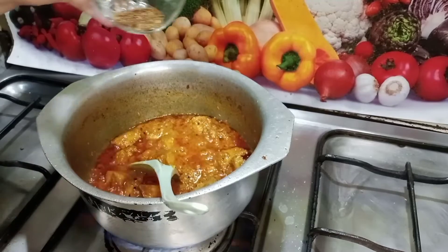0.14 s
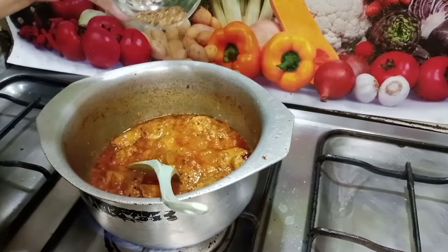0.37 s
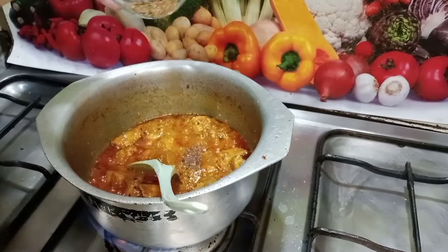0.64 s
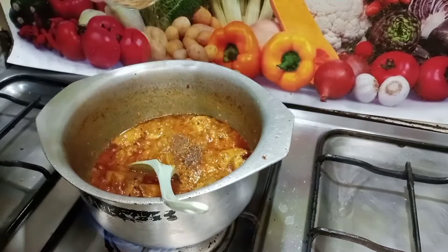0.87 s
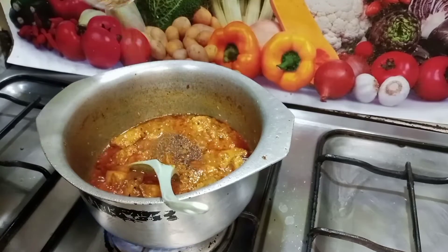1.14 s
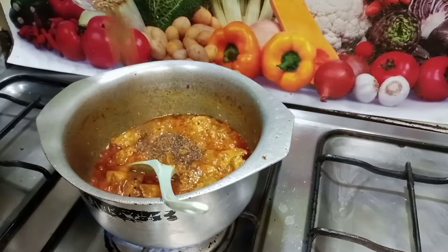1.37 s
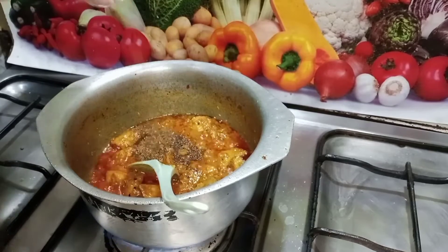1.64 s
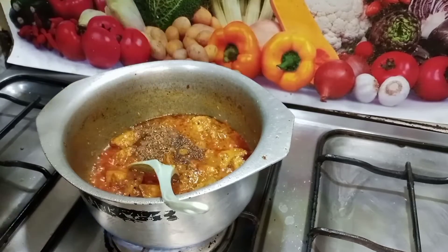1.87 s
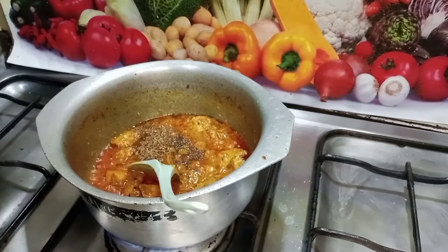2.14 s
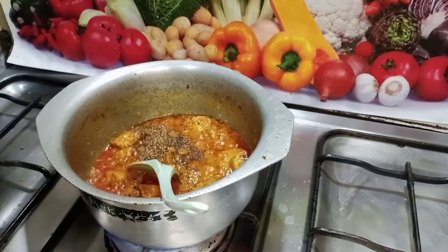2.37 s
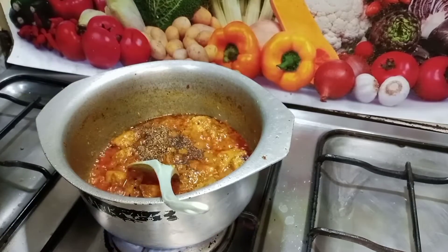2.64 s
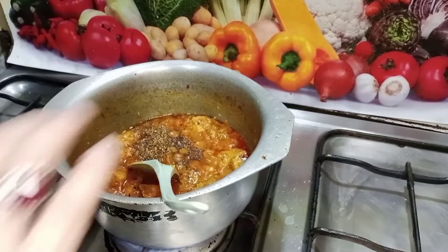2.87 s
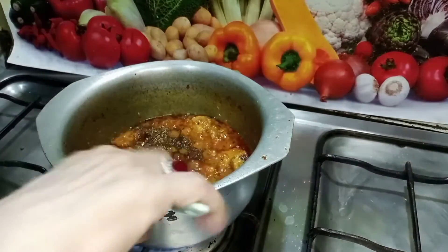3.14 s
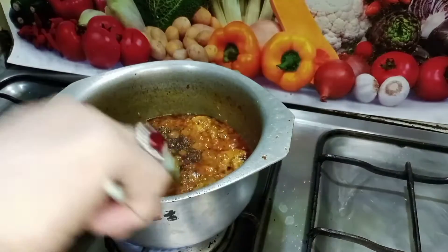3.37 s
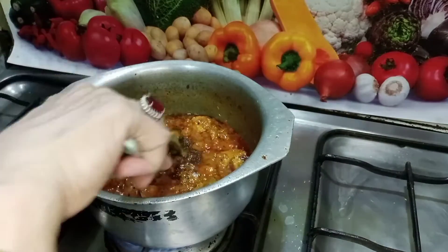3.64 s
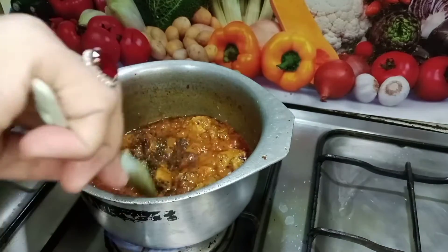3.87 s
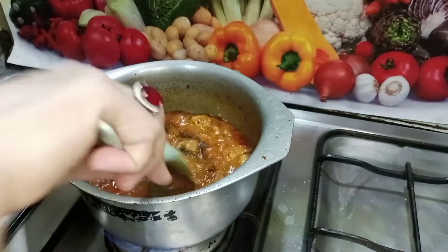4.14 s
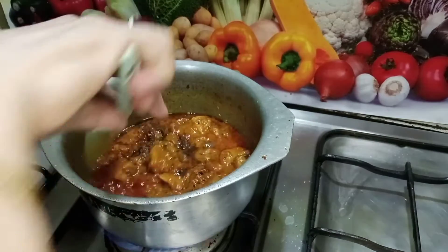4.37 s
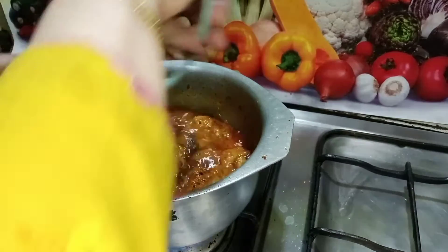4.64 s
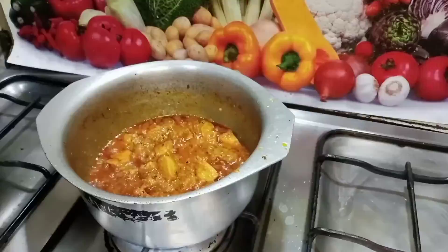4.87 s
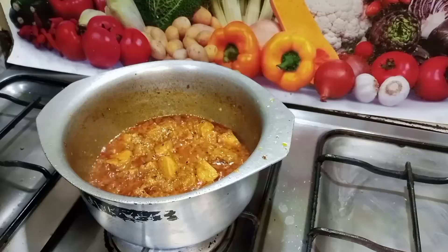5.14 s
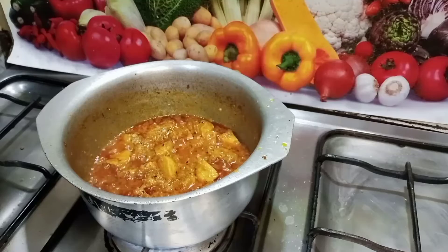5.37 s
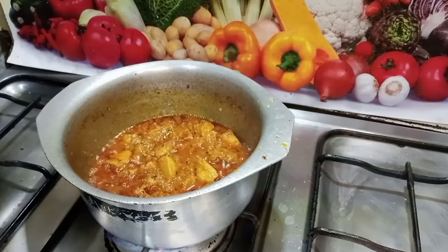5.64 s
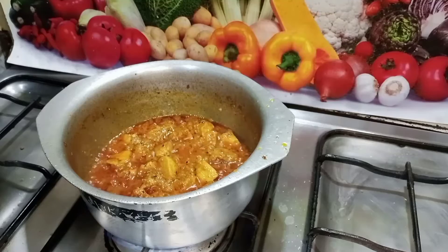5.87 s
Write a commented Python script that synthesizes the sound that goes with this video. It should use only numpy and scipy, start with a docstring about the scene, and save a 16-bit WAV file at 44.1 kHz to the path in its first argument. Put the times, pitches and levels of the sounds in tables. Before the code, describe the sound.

In a small hard kitchen, a thick curry fizzes and crackles in a thin metal pot above a soft gas flame. Fat spits now and then. Midway a dish is set down hard off to the side and bounces briefly. A ladle then knocks the pot, rings and scrapes its wall, and jolts the stove top with soft thumps before the simmering continues alone. A close phone microphone gives slightly dull treble.

```python
"""Fat fizzes and spits over a soft gas flame as a curry simmers in a thin metal pot in a small hard kitchen.
A dish is set down; a ladle knocks and scrapes the pot and jolts the stove top; all falls silent for 8 ms.
Fizz, roar and rumble are filtered noise with wandering levels; struck things are sums of decaying modes,
and scrapes are stick-slip noise driving the pot's modes.
The microphone is a phone whose treble ends near 8 kHz."""
import sys
import numpy as np
from scipy import signal
from scipy.fft import rfft, irfft
from scipy.io import wavfile
from scipy.ndimage import uniform_filter1d

SR = 44100
rng = np.random.default_rng(int(sys.argv[2]) if len(sys.argv) > 2 else 0)


def elevation(decibels):
    """Turn decibel levels (scalar or array-like) into linear amplitude ratios."""
    levels = np.asarray(decibels, float)
    return 10 ** (levels / 20)


def wav_record(signal):
    """Record a signal, one row per channel, as 16-bit PCM in the file named by sys.argv[1]."""
    frames = np.transpose(np.atleast_2d(signal))
    bounded = np.clip(frames, -1, 1)
    # unit amplitude maps onto the largest positive 16-bit level
    quanta = np.round(bounded * 32767).astype(np.int16)
    wavfile.write(sys.argv[1], SR, quanta)


N = 264893
T = np.arange(N) / SR
HZ = np.arange(N // 2 + 1) * SR / N + 1  # the added 1 Hz keeps the logarithm finite
SILENT_FROM_S, SOUND_AGAIN_S = 5.0915, 5.0995


def unit(x):
    """Normalisation: scale to rms 1."""
    return x / np.sqrt(np.mean(x ** 2))


def onset(x):
    """Normalisation by the attack: rms 1 / 3 over the first 10 ms, which puts the peak near 1."""
    return x / 3 / np.sqrt(np.mean(x[:SR // 100] ** 2))


def colour(x, points):
    """Linear filtering: gain in dB at points in Hz, joined on a log frequency axis."""
    hz, db = np.transpose(points)
    return irfft(rfft(x) * elevation(np.interp(np.log(HZ), np.log(hz), db)), N)


def band(x, lo_hz, hi_hz):
    """Causal band-pass filtering."""
    return signal.sosfilt(signal.butter(2, [lo_hz, hi_hz], "band", fs=SR, output="sos"), x)


def walk(rate):
    """Slow random modulation: levels drawn at this rate per second, smoothed twice, rms 1."""
    hold = int(SR / rate)
    steps = np.repeat(rng.standard_normal(N // hold + 1), hold)
    return unit(uniform_filter1d(uniform_filter1d(steps, hold), hold)[:N])


def clicks(per_s, spread_db):
    """Poisson-like impulses: random in time, most small and a few large."""
    size = elevation(spread_db * np.minimum(rng.exponential(size=N), 5))
    return (rng.random(N) < per_s / SR) * rng.standard_normal(N) * size


def burst(lo_hz, hi_hz, t60):
    """Exponentially decaying band of noise."""
    puff = band(rng.standard_normal(SR // 4), lo_hz, hi_hz)
    return onset(puff * elevation(-60 * T[:SR // 4] / t60))


def ring(modes):
    """Modal superposition: decaying sines, neighbours in opposite phase."""
    t = T[:SR // 2]
    out = 0
    for k, (hz, db, t60) in enumerate(modes):
        out = out + (-1) ** k * elevation(db - 60 * t / t60) * np.sin(2 * np.pi * hz * t)
    return onset(out)


def rattle(modes, contact_s):
    """Modal excitation by a short uneven contact, at first flat in spectrum, that weakens by 16 dB."""
    contact = rfft(rng.standard_normal(int(contact_s * SR)))
    contact = irfft(contact / np.abs(contact))
    contact = contact * elevation(-16 * np.linspace(0, 1, len(contact)))
    return onset(band(signal.fftconvolve(ring(modes), contact)[:SR // 2], 170, 7800))


def strike(events, response):
    """Superposition: sound a response at each (start in seconds, level in dB)."""
    out = np.zeros(N + len(response))
    for s, db in events:
        start = int(s * SR)
        out[start:start + len(response)] += elevation(db) * response
    return out[:N]


def favour(hz, contact_hz, lift_db):
    """Modal coupling: the place of contact lifts, in dB, the wall modes near its own pitch."""
    return lift_db * np.exp(-(np.log(hz / contact_hz) / 0.067) ** 2)  # width in natural log of Hz


def rumble():
    """Band noise with a falling envelope: a low rumble that dies away from the start."""
    start_db, fade_db_per_s = -54.5, 11.5
    level_db = start_db - fade_db_per_s * T + 2.5 * walk(12)
    return elevation(level_db) * unit(band(rng.standard_normal(N), 260, 560))


# Air resonances of the pot. Each row: frequency in Hz, width in Hz, boost in dB (negative for a dip).
POT_AIR = [(655.5, 25, 7.5), (1237, 62, 9.5), (1914, 170, 4.5), (2447, 39, 2.5), (2956, 24, 5),
           (3780, 26, 7.5), (4520, 390, -2.5), (6400, 77, 8)]


def pot_air(x):
    """Cavity resonance: standing waves in the open pot lift their own pitches."""
    gain = 1
    for hz, width_hz, boost_db in POT_AIR:
        gain = gain + (elevation(boost_db) - 1) / (1 + (2 * (HZ - hz) / width_hz) ** 2)
    return unit(irfft(rfft(x) * gain, N))


# Colour of the flame noise ahead of the pot's air. Each row: frequency in Hz, relative gain in dB.
ROAR_COLOUR = [(18, -65), (34, -23.5), (113, -3.5), (412, -7.5), (667, -2), (908, -8.5), (1210, -5.5),
               (1680, -11.5), (1850, -10), (2720, -16.5), (3000, -11.5), (3900, -45.5), (6600, -120)]


def flame():
    """Turbulent noise: a gas roar fluttering by octaves, a wavering stove-top boom, a faint burner whistle."""
    parts = 0
    for lo_hz in 20 * 2. ** np.arange(9):
        parts = parts + elevation(1.56 * walk(8)) * band(rng.standard_normal(N), lo_hz, 2 * lo_hz)
    roar = pot_air(colour(parts, ROAR_COLOUR) * elevation(0.88 * walk(6)))
    boom_hz, boom_width_hz = 111, 38.5
    boom = band(rng.standard_normal(N), boom_hz - boom_width_hz / 2, boom_hz + boom_width_hz / 2)
    boom = unit(boom * elevation(2.2 * walk(5.1)))
    whistle_hz, whistle_db = 2190, -64.5
    whistle = np.sin(2 * np.pi * np.cumsum(whistle_hz + 2.6 * walk(3)) / SR)
    return roar, boom, elevation(whistle_db) * whistle


# Colour of the bubble noise ahead of the pot's air. Each row: frequency in Hz, relative gain in dB.
FIZZ_COLOUR = [(820, -54.5), (1400, -9), (1710, -21.5), (1850, -12.5), (2300, -13.5), (2520, -3.5),
               (2750, -10.5), (3000, -4.5), (3340, -5.5), (6420, -1.5), (7800, -5), (10100, -24.5),
               (17200, -120)]


def fizz():
    """Random superposition: tiny steam bubbles burst in the fat, each band flaring alone; droplets crackle."""
    bubbling = 0
    for centre in 1500 * 1.2913 ** np.arange(7):
        bubbles = rng.standard_normal(N) + 0.5 * unit(clicks(2500, spread_db=3.0))
        flicker = elevation(0.29 * walk(9) + 0.93 * walk(40))
        bubbling = bubbling + flicker * band(bubbles, centre / 1.185, centre * 1.137)
    flare = elevation(1.1 * walk(6))  # shared by all bands
    droplets = signal.fftconvolve(clicks(250, spread_db=2.5), burst(3000, 7500, 0.011))[:N]
    crackle = elevation(-13.5) * unit(band(droplets, 3000, 7500))
    return pot_air(colour(bubbling, FIZZ_COLOUR) * flare) + crackle


# Loudest spits of fat. Each row: start in seconds, level in dB, pitch in Hz.
SPITS = [(1.7013, -24, 6790), (2.277, -30, 6550), (3.629, -32.5, 6800), (3.789, -36, 5960),
         (4.01, -38, 5500), (4.07, -36.5, 6400), (5.699, -36.5, 6640)]


def spits():
    """Bubble resonance: single bigger bubbles pop with a short bright ring and a splutter."""
    out = 0
    for s, db, hz in SPITS:
        pop = 0.72 * ring([(hz, 0, 0.02)])[:SR // 4]
        splutter = burst(0.83 * hz, 1.09 * hz, 0.078)
        out = out + strike([(s, db)], pop + splutter)
    return out


# Modes of dish and counter. Each row: frequency in Hz, relative level in dB, 60 dB decay time in seconds.
COUNTER = [(360, -13, 0.05), (564, -13.5, 0.04), (703, -8.5, 0.04), (860, -3.5, 0.03), (1030, 3.5, 0.02),
           (1170, 11.5, 0.026), (1285, 7, 0.035), (1410, 10.5, 0.02), (1560, 2.5, 0.017), (1769, 7, 0.07),
           (1900, 6, 0.022), (2130, -5.5, 0.026), (2380, 1, 0.02), (2490, 10, 0.032), (2820, 9, 0.026),
           (3360, -7, 0.02), (3930, -18, 0.02), (4440, -9, 0.019)]
# Blows of the dish. Each row: start in seconds, level in dB, pitch in Hz of the modes it favours.
SET_DOWN = [(3.1200, -13.5, 1800), (3.1290, -20, 1200), (3.1550, -22.5, 1450), (3.1750, -27, 1200),
            (3.1860, -29, 1750), (3.2050, -29, 1800), (3.2550, -33, 1250), (3.277, -32, 1200),
            (3.2880, -35.5, 1750)]


def counter():
    """Impact excitation: a dish set down hard, with a bounce; modes in a dense clack over a dull knock."""
    out = 0
    for s, db, contact_hz in SET_DOWN:
        modes = []
        for hz, mode_db, t60 in COUNTER:
            lift_db = 5.5 * np.exp(-(np.log(hz / contact_hz) / 0.17) ** 2)
            modes.append((hz, mode_db + lift_db, t60))
        clack = elevation(1) * burst(840, 2000, 0.025) + elevation(-8) * burst(2200, 3800, 0.051)
        knock = elevation(-19.5) * burst(220, 480, 0.06)
        out = out + strike([(s, db)], rattle(modes, 0.0068))
        out = out + strike([(s, db)], clack + knock)
    return out


# Modes of the stove top. Each row: frequency in Hz, relative level in dB, 60 dB decay time in seconds.
STOVE_TOP = [(52.5, -15, 0.25), (96.8, 5.5, 0.24), (107.7, 9, 0.12), (160, -18, 0.145), (232, -5.5, 0.13),
             (327, 1, 0.13), (432, -8, 0.093), (620, -7, 0.098), (737, 1, 0.13)]
# Jolts. Each row: start in seconds, level in dB, level in dB of the upper modes against the boom.
THUMPS = [(5.113, -45, 19), (5.123, -26.5, -7), (5.142, -47.5, 22), (5.200, -28.5, -1), (5.243, -29.5, 0),
          (5.29, -37, 2.5)]


def thumps():
    """Plate modes: soft jolts of the stove top, whose two strongest low modes beat."""
    soften = np.clip(T[:SR // 2] / 0.012, 0, 1)
    boom, upper = ring(STOVE_TOP[:3]) * soften, ring(STOVE_TOP[3:]) * soften
    out = 0
    for s, db, upper_db in THUMPS:
        out = out + strike([(s, db)], band(boom + elevation(upper_db) * upper, 35, 1000))
    return out


# Modes of the pot wall, scraped and struck. Each row: frequency in Hz, relative level in dB,
# 60 dB decay time in seconds.
POT = [(640, -8, 0.12), (815, -11.5, 0.052), (1091, -4.5, 0.064), (1542, -2.5, 0.065), (1700, -3.5, 0.065),
       (2116, -16, 0.1), (2240, -6.5, 0.18), (2400, -2.5, 0.16), (2552, -14.5, 0.1), (2710, -4.5, 0.12),
       (2930, -11, 0.14), (3200, -8.5, 0.068), (3686, -3.5, 0.036), (3910, -2, 0.073), (4065, -1.5, 0.079),
       (4280, -2.5, 0.053), (4750, -15.5, 0.059), (5060, -7, 0.07), (5100, -10, 0.087), (5500, -7.5, 0.098),
       (5735, -3.5, 0.037), (5900, -6, 0.067), (6140, -6, 0.08), (6295, -5.5, 0.056), (6540, -4, 0.035),
       (6640, -11.5, 0.05), (6940, -2, 0.074), (7000, -10, 0.05), (7290, -5.5, 0.046), (7500, -6, 0.033)]
# Ladle strokes. Each row: touch in seconds, moment the release begins in seconds, level in dB at touch against
# that moment, drive in dB at that moment of bright rasp, middle rasp and dull rub,
# wall pitch in Hz favoured by the contact.
SCRAPES = [(4.285, 4.313, 1, -31.5, -30, -36.5, 6160), (4.632, 4.663, -2, -28, -31, -50, 5600),
           (4.629, 4.652, 4, -34, -38.5, -51, 4300), (4.684, 4.717, -4.5, -58, -50, -32.5, 790),
           (4.801, 5.1, -4, -33.5, -35, -37.5, 1090), (4.851, 4.848, -4, -42, -32, -53, 2400),
           (4.812, 4.899, -1.5, -39, -49, -45, 5900), (4.936, 4.981, -11, -27, -26, -48, 2470),
           (5.042, 5.048, -8, -41.5, -34, -43.5, 2380), (5.121, 5.147, -2, -38, -32.5, -35.5, 3900),
           (5.176, 5.213, -4.5, -25.5, -28, -41.5, 5060)]


def scrapes():
    """Stick-slip friction: chatter drives the wall modes, each stroke letting go at the same rate."""
    release_db_per_s, wall_ring_db = 254, 6
    slips = unit(clicks(4000, spread_db=0.5)) + 1.1 * rng.standard_normal(N)
    slips = slips * elevation(1.25 * walk(60))
    bands = [unit(band(slips, lo, hi)) for lo, hi in ((3900, 7100), (1920, 3430), (540, 1320))]
    strokes = []
    for touch, release, touch_db, *levels, _ in SCRAPES:
        press_db = np.interp(T, [touch, release, release + 1], [touch_db, 0, -release_db_per_s])
        same_side = (T < SILENT_FROM_S) == (touch < SILENT_FROM_S)  # no stroke spans the silence
        on = np.clip((T - touch) / 0.0087 + 1, 0, 1) * same_side
        chatter = sum(elevation(db) * part for db, part in zip(levels, bands))
        strokes.append(on * elevation(press_db) * chatter)
    strokes = np.array(strokes)
    contact_hz = np.array(SCRAPES)[:, -1]
    sung = 0
    for hz, db, t60 in POT:
        drive = elevation(favour(hz, contact_hz, lift_db=7)) @ strokes
        peak = signal.iirpeak(hz, hz * t60 * np.pi / np.log(1000), fs=SR)  # Q from the decay time
        sung = sung + signal.lfilter(*peak, elevation(wall_ring_db + db + 1.9 * walk(18)) * drive)
    return sung + elevation(-10) * strokes.sum(axis=0)


# Modes of the ladle. Each row: frequency in Hz, relative level in dB, 60 dB decay time in seconds.
LADLE = [(250, -11, 0.03), (600, -1, 0.022), (676, 1.5, 0.029), (900, 3.5, 0.0094), (1135, 2, 0.015),
         (1250, 2.5, 0.023), (1390, 6.5, 0.019), (1875, -1.5, 0.023), (2380, -1.5, 0.0078),
         (2930, 1.5, 0.008)]
# Ladle blows. Each row: start in seconds, levels in dB of ladle, pot wall and crack,
# pitch in Hz of the crack and of the wall modes it favours.
BLOWS = [(3.911, -38, -41, -39, 1250), (4.2790, -12.5, -19, -22, 4970), (4.2830, -24, -29, -20, 5600),
         (4.299, -29.5, -40, -20.5, 6360), (4.6250, -36, -13.5, -28, 2720), (4.658, -47, -22.5, -27, 6940),
         (4.665, -54, -21.5, -37, 5735), (4.694, -50, -48, -31, 1820), (4.8, -43, -19.5, -27, 6900),
         (4.8070, -48, -22, -26.5, 6500), (4.936, -36, -24, -30.5, 2930), (5.1148, -29.5, -30.5, -23, 2130),
         (5.1203, -45, -31, -24, 3900), (5.1727, -46, -33, -30.5, 7000), (5.195, -28, -36, -25, 5000)]


def blows():
    """Impact excitation: each blow rings ladle and pot wall, cracks and thuds in its own measure."""
    thud_under_crack_db = -13.5
    out = 0
    for s, ladle_db, wall_db, crack_db, crack_hz in BLOWS:
        modes = [(hz, db + favour(hz, crack_hz, lift_db=13.3), t60) for hz, db, t60 in POT]
        wall = band(ring(modes), 2220, 7300)  # a hard short contact reaches the upper modes
        crack = burst(0.71 * crack_hz, 1.28 * crack_hz, 0.055)
        thud = burst(110, 330, 0.15)
        out = out + strike([(s, ladle_db)], rattle(LADLE, 0.0061))
        out = out + strike([(s, wall_db)], wall)
        out = out + strike([(s, crack_db)], crack)
        out = out + strike([(s, crack_db + thud_under_crack_db)], thud)
    return out


# Decay of the room. Each row: frequency in Hz, 60 dB decay time in seconds.
KITCHEN = [(100, 1), (500, 0.48), (2000, 0.42), (8000, 0.25)]


def kitchen(near, far):
    """Diffuse reverberation: the tail loses its treble first; far things are heard more through the room."""
    near_wet_db, far_wet_db, build_up_s = -11, -8, 0.013
    t, tail = T[:SR], 0
    hz, t60 = np.transpose(KITCHEN)
    for centre in 90 * 2. ** np.arange(7):
        decay_s = np.interp(np.log(centre), np.log(hz), t60)
        noise = band(rng.standard_normal(SR), centre / np.sqrt(2), centre * np.sqrt(2))
        tail = tail + noise * elevation(-60 * t / decay_s)
    tail = tail * np.clip(t / build_up_s, 0, 1)  # reflections build up
    tail = tail / np.sqrt(np.sum(tail ** 2))
    send = elevation(near_wet_db) * near + elevation(far_wet_db) * far
    return near + far + signal.fftconvolve(send, tail)[:N]


# Levels of the simmering. Each row: time in seconds, levels in dB of fizz, flame roar and stove-top boom.
SIMMER = [(0.0, -43, -48.5, -54.5), (0.4, -43.5, -48, -57.5), (1.0, -44, -51, -66),
          (1.35, -43.5, -49, -61.5), (1.55, -41.5, -51, -55.5), (1.75, -42.5, -49, -60),
          (2.05, -43.5, -49.5, -73), (2.45, -42.5, -49, -56.5), (2.75, -44, -49.5, -56),
          (3.0, -43.5, -48.5, -69), (3.55, -42.5, -49, -63), (3.75, -42.5, -49.5, -58),
          (3.95, -42, -46.5, -53), (4.1, -42.5, -48.5, -55), (4.2, -47.5, -47.5, -58),
          (4.27, -43, -49.5, -61), (4.6, -41, -47.5, -55.5), (5.4, -43, -48, -54),
          (5.65, -43.5, -49.5, -60.5), (6.0, -42.5, -49, -63)]
# Response of the phone microphone. Each row: frequency in Hz, gain in dB.
PHONE = [(20, 8), (80, -1), (7300, 0), (7700, -2.5), (8000, -9), (8400, -15), (8700, -51.5), (16000, -70)]


def scene():
    """Superposition and gating: all sound stops dead, tails included, and resumes after a brief silence."""
    roar, boom, whistle = flame()
    layers = fizz(), roar, boom
    near = blows() + scrapes() + spits()
    s, *levels = np.transpose(SIMMER)
    steady = whistle + rumble() + thumps()
    for db, layer in zip(levels, layers):
        steady = steady + elevation(np.interp(T, s, db)) * layer
    out = 0
    for heard, far in ((T < SILENT_FROM_S, counter()), (T > SOUND_AGAIN_S, 0)):
        out = out + heard * colour(steady + kitchen(heard * near, far), PHONE)
    return out[None]


def low_pass(x):
    """Removes everything above the highest recorded frequency."""
    return signal.sosfilt(signal.butter(12, 8580, fs=SR, output="sos"), x)


def record(dry):
    """Signal chain: the finished mix passes on to its last stage."""
    return low_pass(dry)


dry = scene()
out = record(dry)
wav_record(out)
```